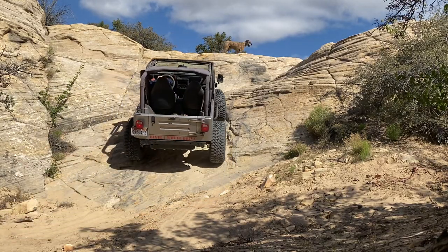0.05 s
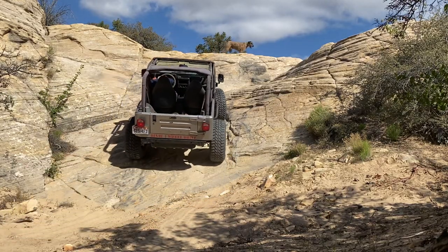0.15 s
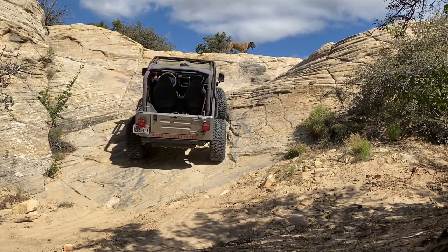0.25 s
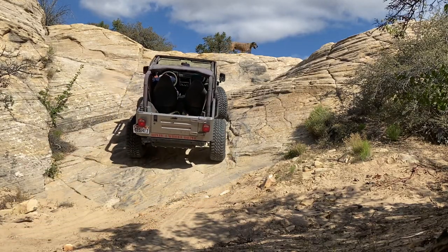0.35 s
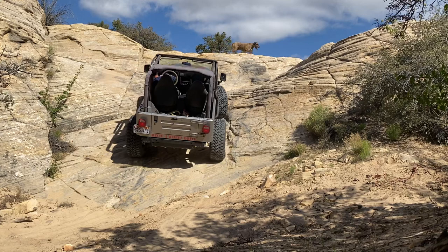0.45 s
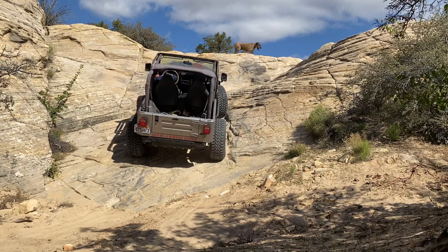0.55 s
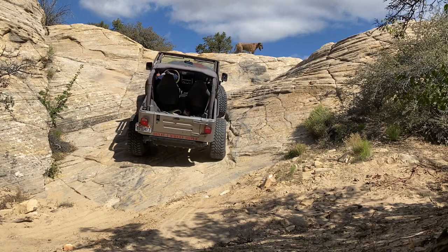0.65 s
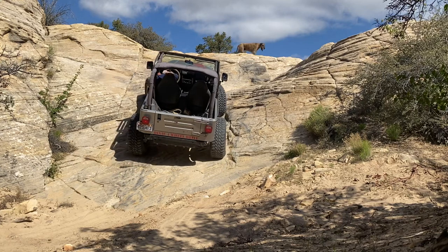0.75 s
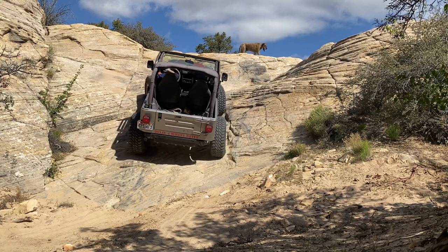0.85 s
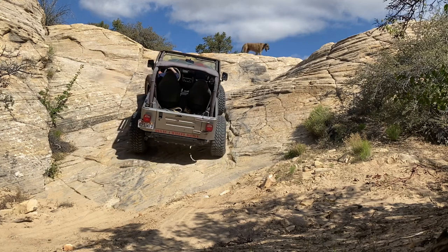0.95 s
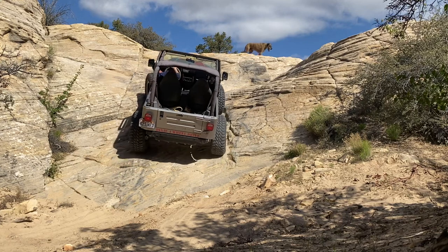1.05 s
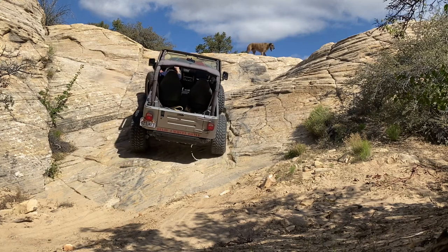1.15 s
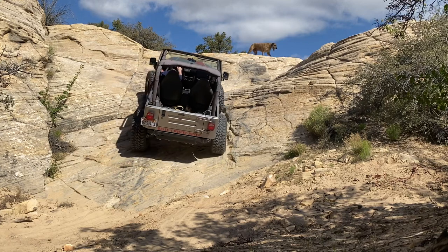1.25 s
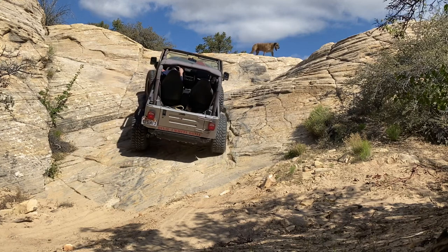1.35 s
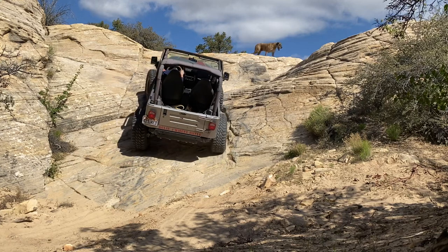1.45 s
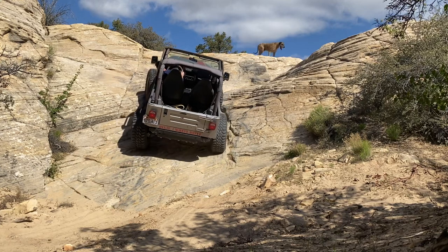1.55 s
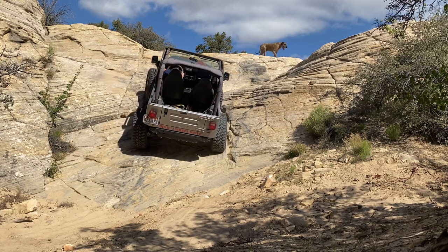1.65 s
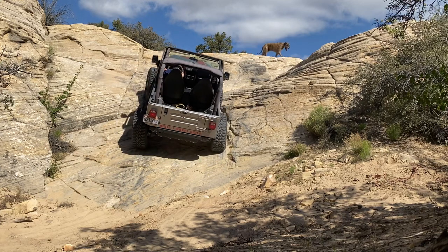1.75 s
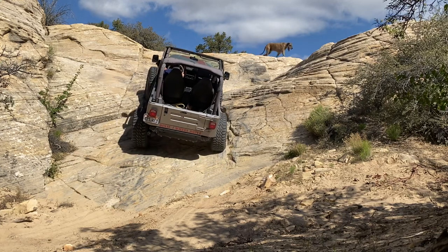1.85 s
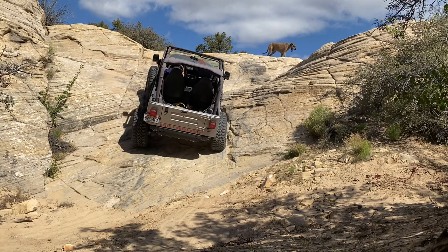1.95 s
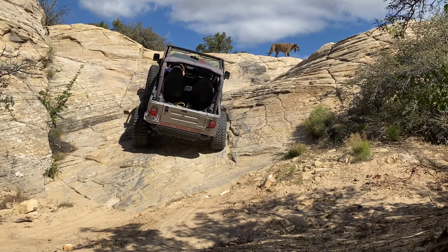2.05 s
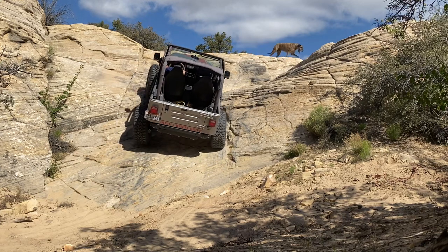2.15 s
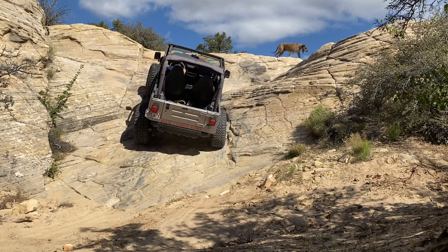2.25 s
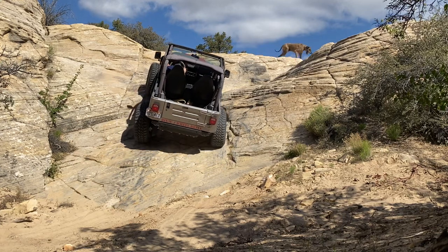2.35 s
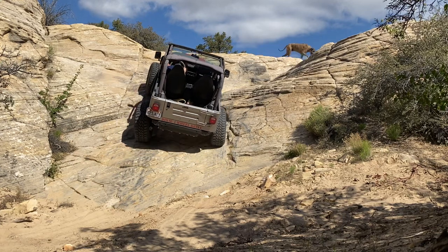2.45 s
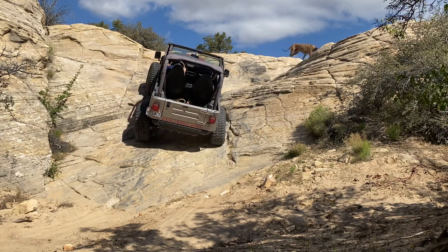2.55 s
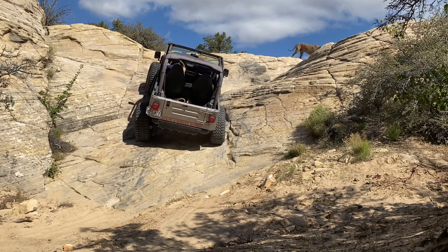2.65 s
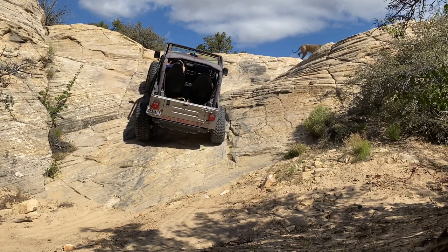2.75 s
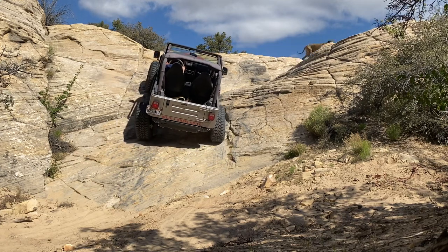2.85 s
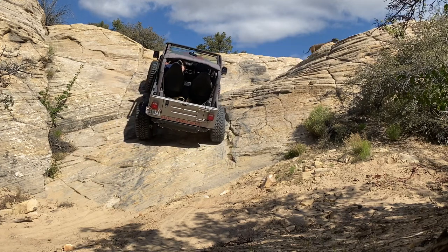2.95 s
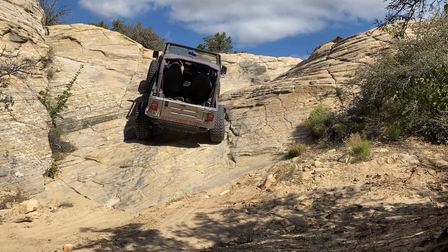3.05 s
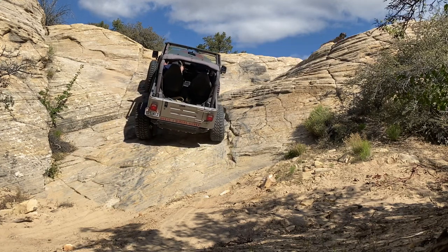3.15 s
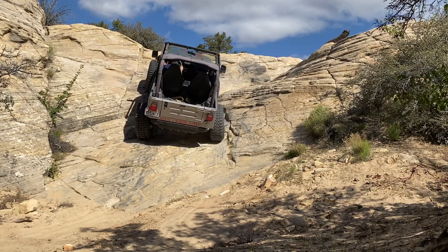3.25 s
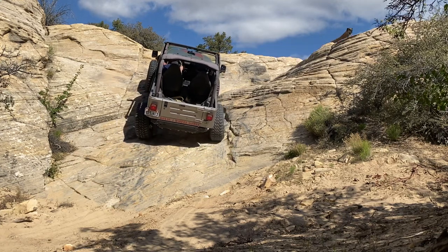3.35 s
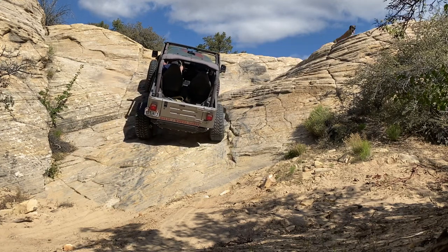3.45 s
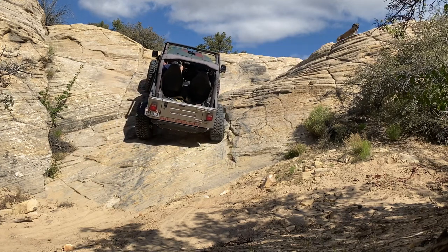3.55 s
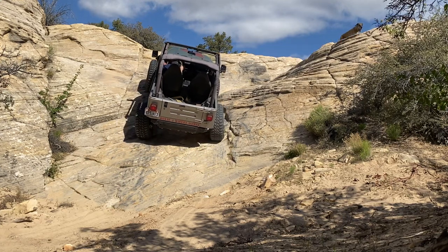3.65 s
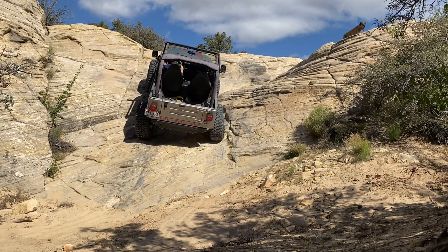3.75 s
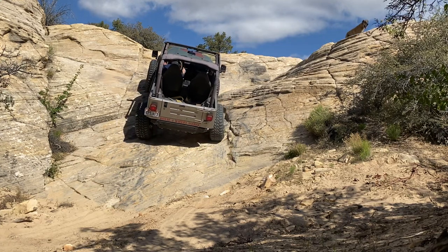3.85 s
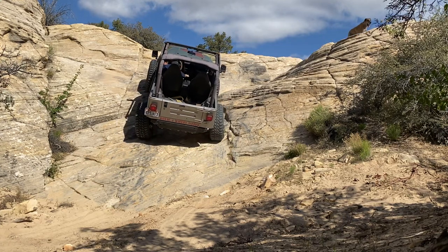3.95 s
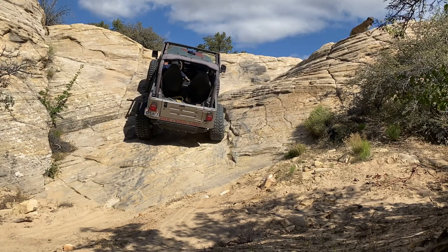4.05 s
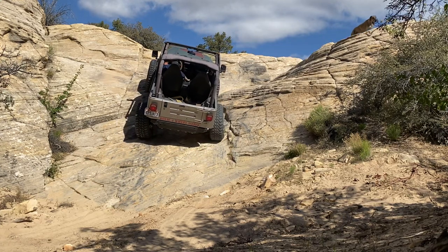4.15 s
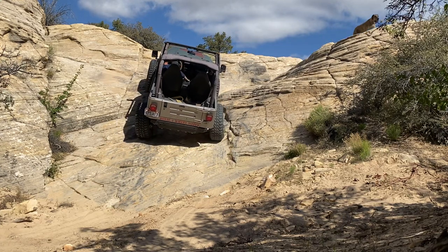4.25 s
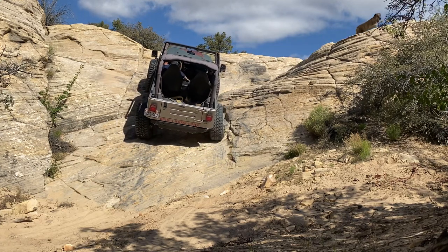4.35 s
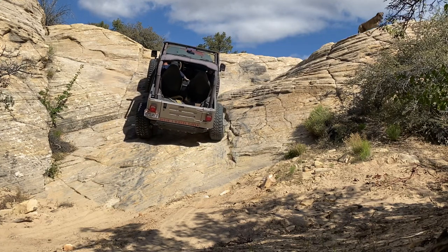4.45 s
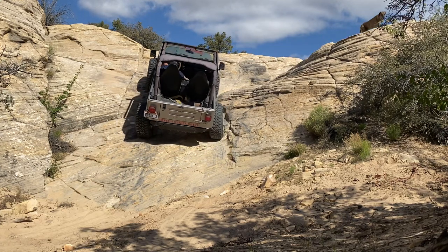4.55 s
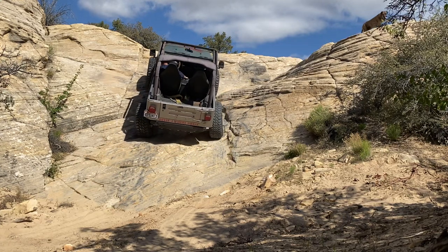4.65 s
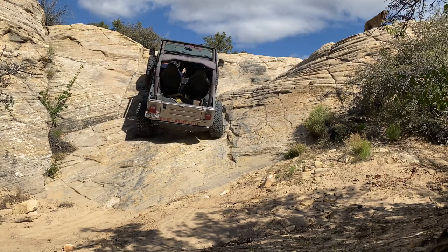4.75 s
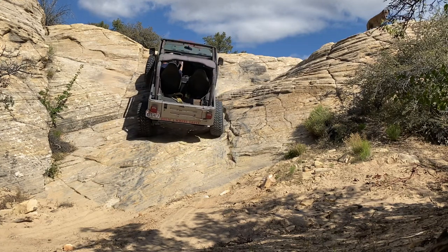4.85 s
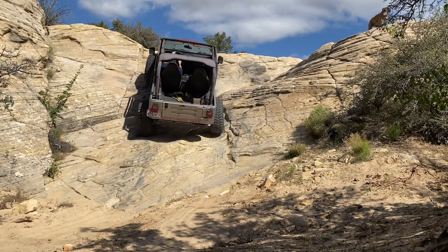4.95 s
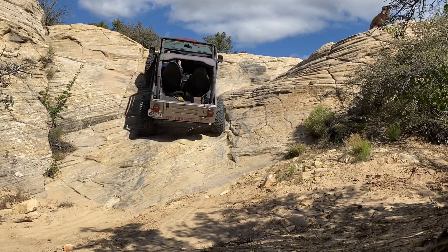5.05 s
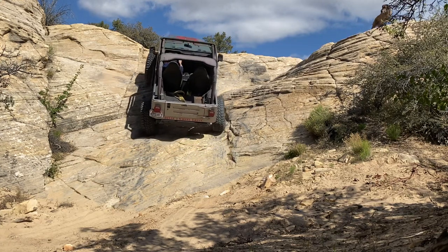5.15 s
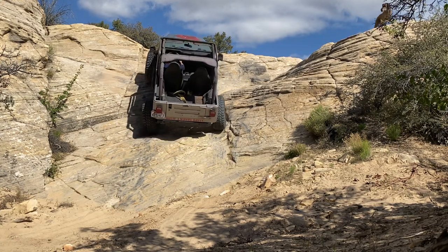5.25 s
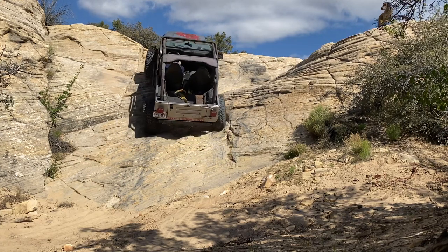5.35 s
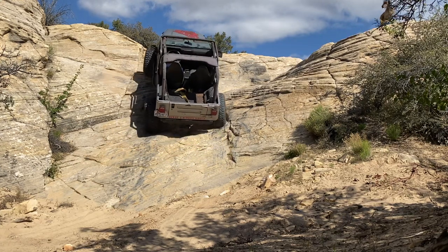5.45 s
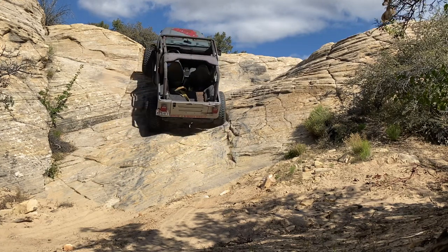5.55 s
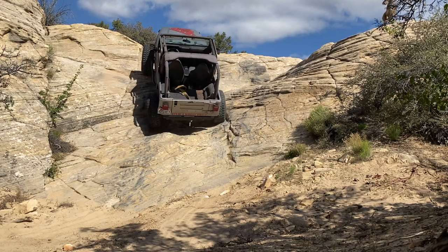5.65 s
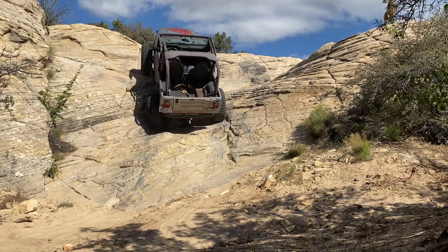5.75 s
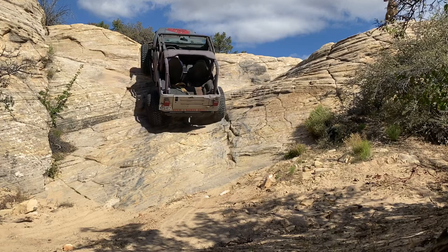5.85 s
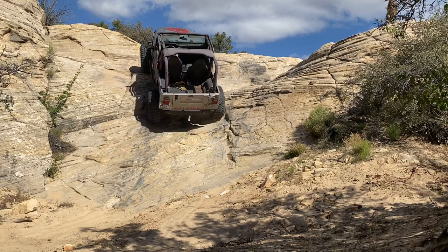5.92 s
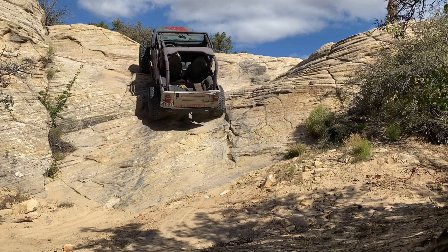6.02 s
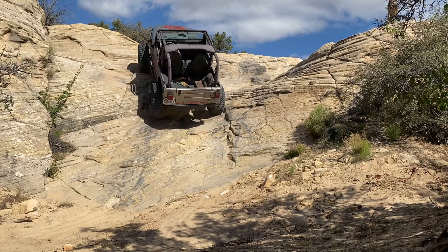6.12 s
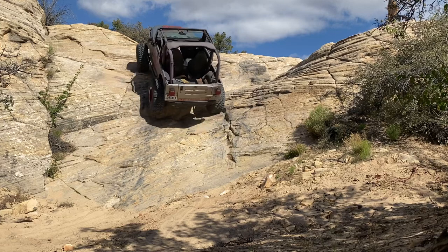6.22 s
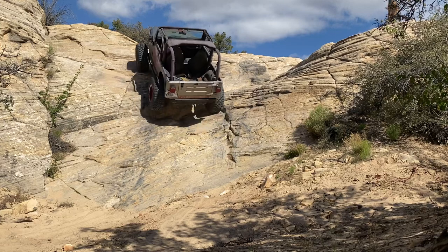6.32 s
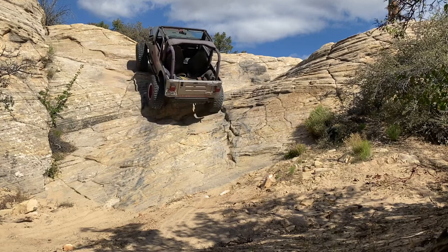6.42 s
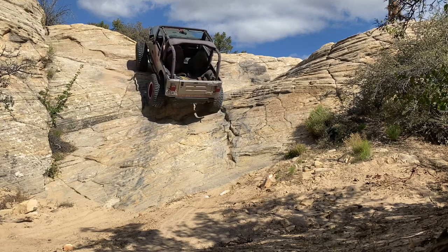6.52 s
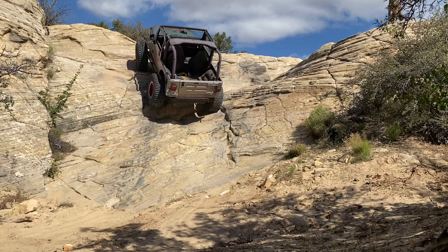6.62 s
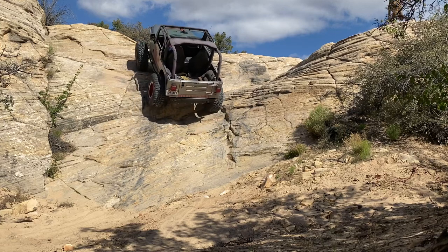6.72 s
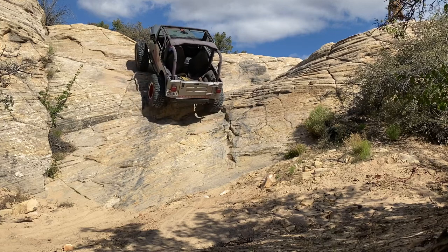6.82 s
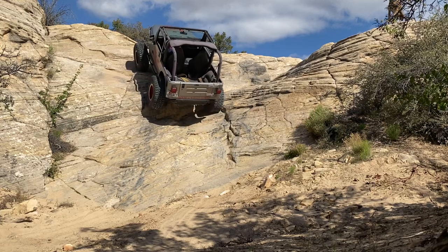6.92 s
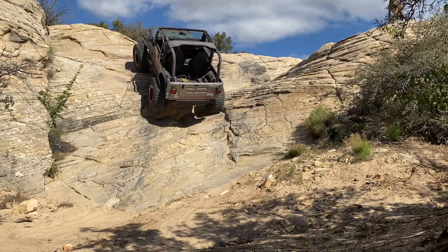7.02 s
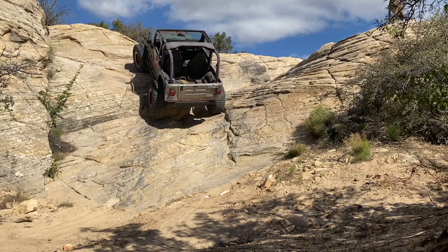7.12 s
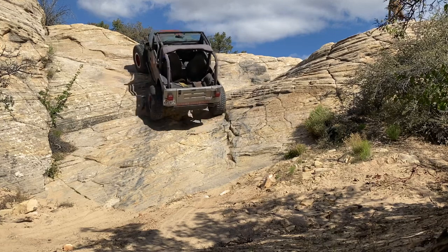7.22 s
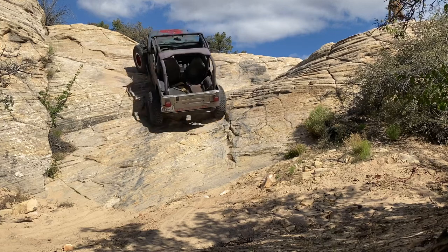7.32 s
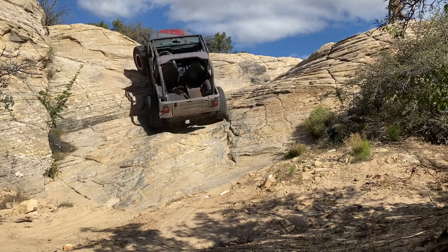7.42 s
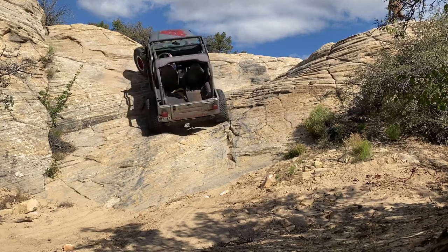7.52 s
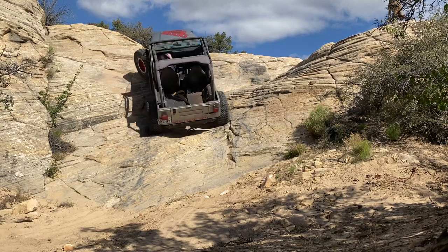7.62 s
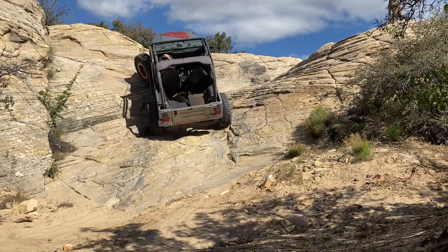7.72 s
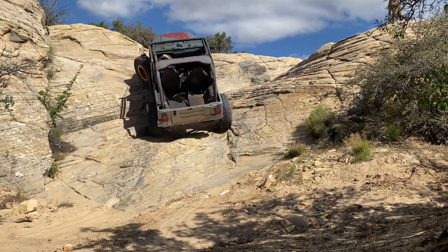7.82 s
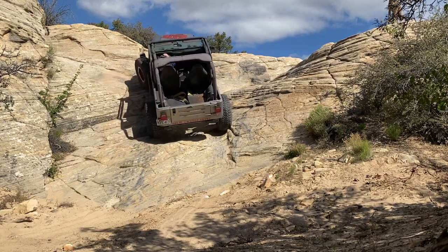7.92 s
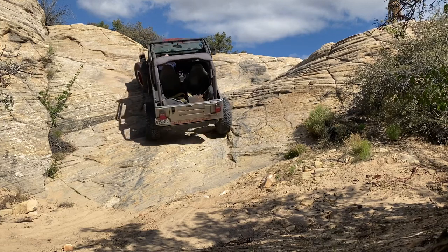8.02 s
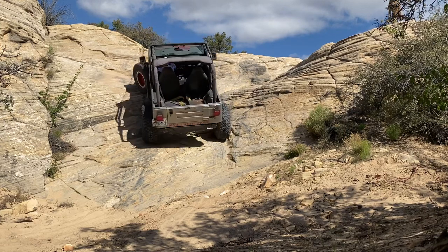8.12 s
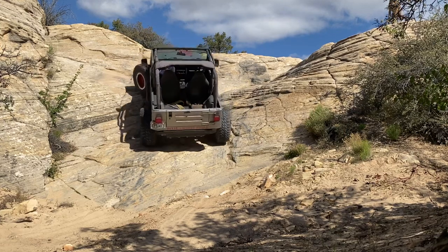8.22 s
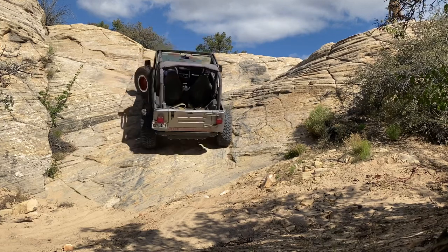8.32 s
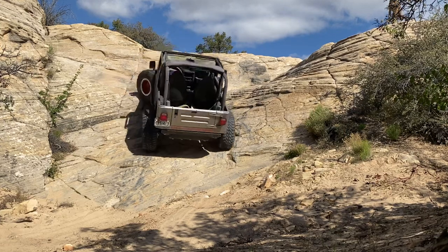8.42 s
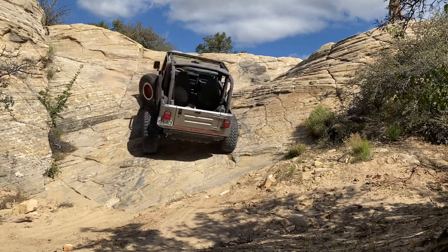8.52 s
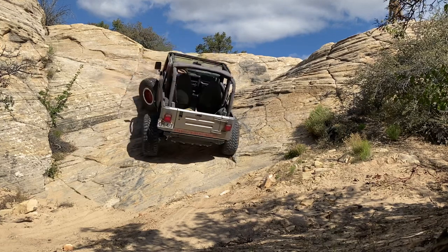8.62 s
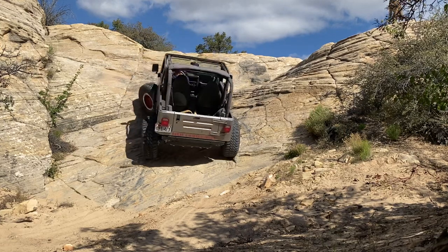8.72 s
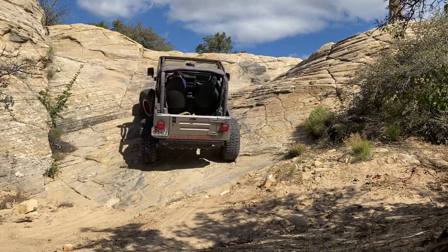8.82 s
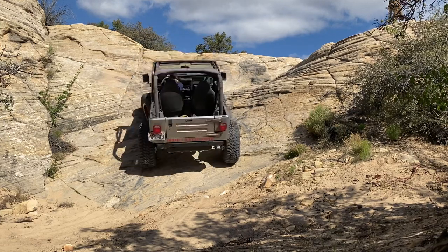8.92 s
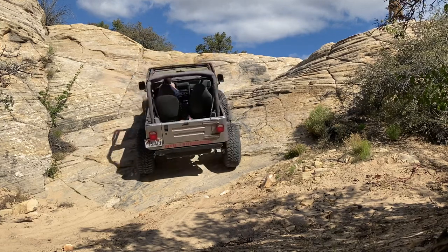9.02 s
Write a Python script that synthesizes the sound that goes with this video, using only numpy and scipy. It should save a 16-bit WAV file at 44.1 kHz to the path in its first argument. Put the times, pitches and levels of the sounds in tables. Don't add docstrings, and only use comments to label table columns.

```python
import sys
import numpy as np
from scipy import signal
from scipy.fft import rfft, irfft, next_fast_len
from scipy.io import wavfile
from scipy.ndimage import uniform_filter1d

SR = 44100
rng = np.random.default_rng(int(sys.argv[2]) if len(sys.argv) > 2 else 0)


def wav_out(sig):
    wavfile.write(sys.argv[1], SR, np.round(np.clip(np.atleast_2d(sig).T, -1, 1) * 32767).astype(np.int16))


def invert_db(x):
    u = np.asarray(x, float) / 20
    return 10 ** u


N = 400428

# multiple_of_firing_rate, lag_rad, slip_rad_per_s
MAIN_ORDERS = [(1, 0, 0), (1.5, -.6, .6), (2, 1.9, .8), (2.5, -1.4, 1), (3, 1.8, .85), (3.5, 2.4, .7),
               (4, .6, .8), (5, 0, .9)]
# frequency_hz, level_db
PIPE = [(20, -34), (45, 0), (75, 3.5), (130, 0), (190, 5.5), (250, -3.5), (310, -3), (420, -7.5),
        (800, -63)]


def evened(x):
    return x / np.sqrt(np.mean(x ** 2) + 1e-20)


def columns(rows):
    s, *rest = np.transpose(rows)
    return [np.interp(np.arange(N) / SR, s, c) for c in rest]


def read(points, hz, axis=1):
    table = np.transpose(points)
    return np.interp(np.log(hz + 1), np.log(table[0] + 1), table[axis])


def add(mix, s, sound):
    part = mix[..., round(s * SR):][..., :sound.shape[-1]]
    part += sound[..., :part.shape[-1]]


def drift(seconds):
    size = max(round(seconds * SR / 64), 2)
    steps = rng.standard_normal(N // 64 + 2)
    steps = uniform_filter1d(uniform_filter1d(steps, size), size)
    return np.interp(np.arange(N) / 64, np.arange(len(steps)), evened(steps))


def noise(shape, patchy_db, size=512):
    hz = np.fft.rfftfreq(size, 1 / SR)
    frames = 4 * N // size + 6
    a, b, c, d, patches = rng.standard_normal((frames, len(hz), 5)).T
    patches = evened(uniform_filter1d(uniform_filter1d(patches, 6, axis=0), 12, axis=1))
    z = np.array([a + 1j * b, c + 1j * d]) * invert_db(read(shape, hz)[:, None] + patchy_db * patches)
    return evened(signal.istft(z, nperseg=size, noverlap=3 * size // 4)[1][:, :N])


def engine():
    # start_s, firing_rate_hz, load_db,
    # unevenness_db, bite_db
    revs = [(0.0, 57.66, -14.5, 1.8, -35), (0.43, 61.14, -13, 1.96, -38.4), (1.0, 58.23, -17, 2.0, -34),
            (1.62, 56.37, -17, 1.54, -31.5), (2.0, 57.84, -17, 2.0, -33.5), (2.33, 60.5, -17, 2.5, -36.5),
            (2.9, 58.98, -13.5, 2.0, -39.5), (3.4, 58.48, -13.5, 1.86, -39),
            (4.0, 59.66, -13.3, 1.98, -40), (4.39, 60.6, -14, 2.5, -39.7), (4.7, 71.4, -17.0, 3.5, -35.4),
            (4.9, 83, -19, 3, -29), (5.05, 90.4, -12.6, 1.86, -29.5), (5.35, 97.6, -10.5, 1.35, -29.5),
              (5.5, 76.36, -21.5, 3, -31), (5.66, 60.16, -13, 1.95, -44.5), (5.8, 72.36, -13.5, 2.0, -36),
              (5.95, 89.4, -13, 2.16, -32), (6.1, 70.6, -16.5, 2, -36.5), (6.32, 44.85, -16.5, 0.5, -36.5),
              (6.5, 35.3, -24, 1.5, -33), (6.68, 26, -28, 1.5, -29), (6.97, 23.23, -36.5, 4, -32.5),
              (7.15, 37.04, -20, 2.14, -34), (7.4, 44.97, -10.5, -0.8, -33.5),
              (7.71, 49.1, -13.5, -2.5, -28.5), (8.2, 40.74, -17, -1.5, -32),
              (8.69, 33.44, -18.5, 0.6, -36), (9.08, 36.66, -21, 1.5, -33.5)]
    hz, load_db, uneven_db, bite_db = columns(revs)
    flywheel_s = 0.088
    hz = uniform_filter1d(hz, round(flywheel_s * SR), mode="nearest")
    return hz, load_db, uneven_db, bite_db


def throttle(hz):
    lag_s, full_oct_per_s = 0.075, 1
    open_db, shut_db = 4, 6.5
    oct_per_s = uniform_filter1d(np.gradient(np.log2(hz)) * SR, round(lag_s * SR))
    climb = np.tanh(oct_per_s / full_oct_per_s)
    return np.where(climb > 0, open_db, shut_db) * climb


def order_levels(hz, load_db, uneven_db, more_bite_db, open_db):
    # strength_db, gain_db_per_unevenness_db, gain_db_per_bite_db
    firing = [(12.5, -2, -0.09), (-8, 3.5, 0.71), (-0.8, 4.5, 1.6548), (-8.5, 3, 2.02), (1.92, 4.5, -0.59),
              (-11, 6, 1.5), (-2, 0.6, 1.47), (-2.5, 2.5, 1.2)]
    # frequency_hz, level_db
    tailpipe = [(30, -27.2), (45, -24), (60, -10), (72, -2.5), (85, -3.5), (100, -12.5), (120, -15.5),
                (145, -21.5), (165, -19.2), (185, -21), (210, -23), (240, -23.5), (290, -28), (400, -38)]
    levels = [load_db + db + per_uneven * uneven_db + per_bite * more_bite_db + read(tailpipe, k * hz)
              for (k, _, _), (db, per_uneven, per_bite) in zip(MAIN_ORDERS, firing)]
    levels[-3:] = [db + 0.42 * open_db for db in levels[-3:]]
    return levels


def exhaust(hz, turns, main_db, fourth_db, lope_db):
    # multiple_of_firing_rate, level_db
    weak_orders = [(.5, -8.5), (0.749, -13), (1.249, -20), (1.749, -1.5), (2.25, -12.5), (2.75, -6.5),
                   (3.25, -8.5), (3.75, -5), (4.25, -6.5), (4.5, -1.5), (6, -14.5)]
    t = np.arange(N) / SR
    tone = np.zeros(N)
    for (k, lag, slip_rate), db in zip(MAIN_ORDERS, main_db):
        tone += invert_db(db + 0.13 * k * drift(0.079)) * np.cos(2 * np.pi * k * turns + lag + slip_rate * t)
    source_db = uniform_filter1d(fourth_db - read(PIPE, 4 * hz), size=5000)
    for k, db in weak_orders:
        k = round(4 * k) / 4
        drive_db = lope_db if k % 1 else source_db
        level = invert_db(drive_db + db + read(PIPE, k * hz) + 3.0 * drift(0.095))
        tone += level * np.cos(2 * np.pi * (k * turns + rng.random()) + 0.37 * drift(0.088))
    return np.sqrt(2) * tone


def puffs(turns, depth, spread_db):
    strength = invert_db(spread_db * rng.standard_normal(1000))[turns.astype(int)]
    return uniform_filter1d(evened(1 - depth + depth * strength * np.exp(-(turns % 1) / 0.7)), 60)


def rumble(turns, effort_db, shaken):
    # frequency_hz, level_db
    rumble_shape = [(25, -38.5), (50, 14), (110, 2), (200, 11), (300, 5.5), (370, 4.5), (440, 5.5),
                    (500, 2.5), (570, 0.5), (660, -4), (850, -9.5), (1300, -41)]
    level = np.hypot(invert_db(effort_db), shaken)
    return invert_db(8.0) * level * puffs(turns, 0.41, 2.5) * noise(rumble_shape, 0.96, size=2048)


def tyre_effort():
    # start_s, scrub_db
    tyres = [(0, -51), (4.4, -52.5), (4.72, -43), (5.35, -43), (5.42, -49.5), (5.7, -51.5), (5.8, -43),
             (5.93, -43), (6.33, -57), (6.43, -60), (6.93, -60), (7.1, -52.5), (7.8, -52), (8.05, -39.5),
             (8.4, -44), (8.66, -49), (8.85, -44.5), (9.08, -50.5)]
    return columns(tyres)[0]


def scrub_and_fizz(turns, scrub_db, more_scrub_db, rubbed, fizzed):
    # frequency_hz, level_db
    scrub_shape = [(300, -18), (700, -1.5), (1000, 1), (1400, -1), (2100, -5.5), (2800, -10.5), (3200, -14),
                   (4500, -32)]
    fizz_shape = [(2200, -13), (3200, -4.5), (4400, 1.5), (5700, -1), (6800, -0.5), (8500, 0), (10500, -11),
                  (12300, -16), (16000, -22.5)]
    gusts = drift(0.019)
    scrub_level = invert_db(4.5 + 0.86 * gusts) * np.hypot(invert_db(scrub_db), rubbed)
    fizz_level = invert_db(9.5 + 1.0 * gusts) * np.hypot(invert_db(-64 + more_scrub_db), fizzed)
    scrub = scrub_level * puffs(turns, 0.18, 1.1) * noise(scrub_shape, 1.1)
    return scrub + fizz_level * puffs(turns, .1, 2.1) * noise(fizz_shape, 1.4)


def knock(db, hz, t60):
    t = np.arange(4000) / SR
    crack_band = signal.butter(2, [500, 2600], "band", fs=SR)
    crack = signal.lfilter(*crack_band, rng.standard_normal(len(t)))
    ring = np.sin(2 * np.pi * hz * t) + 0.55 * np.sin(2 * np.pi * 1.63 * hz * t)
    return invert_db(db - 5.5) * (ring * invert_db(-60 * t / np.clip(t60, .02, .1)) + 0.4 * crack * invert_db(-60 * t / 0.0074))


def knocks(mix):
    # start_s, peak_db,
    # pitch_hz, t60_s
    hits = [
        (.283, -31, 600, .04),
        (.384, -37, 600, .04),
        (1.314, -33, 550, 0.036),
        (2.4, -25, 606, 0.043),
        (6.37, -33, 580, 0.062),
            (0.884, -29, 565, 0.065),
        (1.619, -30.5, 470, 0.053),
        (4.472, -13, 388, 0.03),
        (5.789, -22, 405, 0.049),
        (6.953, -27.5, 550, 0.059),
        (7.811, -33, 405, 0.032),
        (7.996, -20, 1200, 0.0364),
        (8.688, -22.5, 403, 0.024),
        (8.754, -12.5, 554, 0.03),
        (8.761, -8, 401, 0.039),
    ]
    for s, *row in hits:
        add(mix, s, knock(*row))


def squeak(length, start_hz, end_hz, db, overtones_db):
    t = np.linspace(0, 1, round(length * SR))
    flutter = uniform_filter1d(uniform_filter1d(rng.standard_normal(9000), 90), 90)
    flutter = evened(flutter)[:len(t)]
    pitch_hz = (start_hz + (end_hz - start_hz) * np.sqrt(t)) * (1 + 0.007 * flutter[::-1])
    turn = 2 * np.pi * np.cumsum(pitch_hz) / SR
    tone = np.sin(turn) + invert_db(overtones_db) * (np.sin(2 * turn) + 0.41 * np.sin(3 * turn))
    return invert_db(db + 13.0 + 2.5 * flutter) * tone * np.minimum(t / 0.17, 1) * (1 - t) ** 1.45


def squeaks(mix):
    # start_s, length_s, start_hz, end_hz, peak_db
    spring = [(.46, 0.073, 3840, 3920, -51), (6.036, 0.16, 3980, 3983, -49), (6.29, .045, 3925, 3915, -78),
              (6.46, 0.027, 3970, 3930, -68), (6.633, .11, 4020, 4044, -47),
              (7.222, 0.029, 3910, 3990, -47), (7.37, .08, 3877, 3940, -42.5),
              (7.71, .045, 4035, 3930, -55.5), (8.388, 0.032, 3964, 3865, -36.5),
              (8.686, 0.16, 3746, 4015, -43)]
    shackle = [(5.577, .05, 4260, 4380, -50), (6.692, .061, 4359, 4600, -56.5),
               (7.421, 0.047, 4520, 4010, -58), (7.672, .05, 4520, 4490, -51.5)]
    panel = [(6.743, .04, 10500, 10460, -59.5), (6.955, 0.062, 4200, 4050, -60),
             (7.006, 0.025, 6520, 6330, -56), (7.892, 0.031, 4314, 4333, -45),
             (7.932, 0.067, 5010, 4800, -52), (8.212, .091, 4520, 4380, -51),
             (8.364, 0.026, 5900, 6000, -45), (8.462, 0.037, 2880, 2830, -33)]
    for joint, overtones_db in (spring, -7.5), (shackle, -3.5), (panel, -22):
        for s, *row in joint:
            add(mix, s, squeak(*row, overtones_db))


def scrapes():
    # start_s, length_s, scrub_db, fizz_re_scrub_db,
    # rumble_re_scrub_db
    scrape_rows = [(1.088, 0.56, -54, -20, 9), (3.453, 1, -54.5, -11, -5), (3.845, 0.51, -60, -25, 2.5),
                   (4.445, 0.077, -47.5, -14, 8.5), (4.897, 0.13, -45, -11, -13),
                   (5.428, 0.091, -48.5, -19, 14.5), (5.632, 0.058, -47, -14, -1),
                   (6.34, 0.085, -56, -12.5, 8), (6.52, .03, -65, 4, 2), (6.686, 0.13, -47.5, -12.5, 6.5),
                   (6.796, 0.12, -54, -29, -1), (6.953, .035, -42, -20, 0), (6.99, 0.054, -48.5, -9, -5),
                   (7.1, 0.23, -56, -17, 8.5), (7.475, 0.28, -48.5, -12, -8), (7.786, 0.0082, -45, -10, 6),
                   (7.82, 0.13, -46, -20, 7), (8.203, 0.05, -42, -13, -5.5), (8.411, 0.16, -40, -6, -7),
                   (8.471, 0.031, -24, -15, -16), (8.588, 0.088, -45.5, -14.5, 10.5),
                   (8.686, 0.048, -46.5, -4, 6), (8.942, 0.058, -45.5, -5, -1),
                   (9.072, 0.025, -50, -7, 11.5)]
    gains = np.zeros((3, N))
    for s, length, db, fizz_db, rumble_db in scrape_rows:
        shape = np.sin(np.pi * np.linspace(0, 1, round(length * SR)) ** 0.59)
        add(gains, s, invert_db(db + np.array([[0], [fizz_db], [rumble_db]])) * shape)
    return gains


def slip(length, hz, width_hz, db):
    t = np.arange(round(length * SR)) / SR
    grit = (rng.standard_normal(9000) + 1j * rng.standard_normal(9000))[:len(t)]
    r = np.exp(-np.pi * width_hz / SR)
    band = signal.lfilter([1], [1, -2 * r, r ** 2], grit) * np.exp(2j * np.pi * hz * t)
    return invert_db(db) * evened(band.real) * np.sin(np.pi * (t / length) ** 0.69)


def tread_slips(mix):
    # start_s, length_s, centre_hz, width_hz, rms_db
    slips = [(2.364, .11, 1300, 1201, -43), (4.653, .08, 1700, 1500, -40.5),
             (5.901, 0.065, 2586, 1400, -39), (6.515, 0.04, 3600, 900, -56), (7.918, .025, 2505, 4050, -33),
             (7.994, 0.2, 1642, 700, -36), (8.815, 0.13, 2350, 750, -41.5), (8.932, 0.033, 6995, 1800, -40)]
    more_slips = [(4.47, 0.097, 1300, 700, -45), (4.669, .05, 6560, 4030, -47), (5.502, .03, 5000, 3000, -50),
                  (5.711, 0.076, 1185, 899.6, -43), (5.861, 0.12, 1096, 599.4, -38),
                  (5.904, 0.059, 6600, 4030, -42), (6.148, 0.18, 1494, 902.4, -47.5),
                  (6.811, 0.12, 1520, 698.6, -50.5), (7.999, 0.054, 7030, 3980, -38),
                  (8.777, .2, 9340, 3976, -48.5)]
    # start_s, peak_db, centre_hz
    bites = [(4.5942, -35.5, 1310), (4.6348, -30.5, 1030), (4.6815, -25, 1584), (4.8264, -26, 1407),
             (4.8642, -22.5, 1116), (4.9195, -26.5, 1028), (5.1626, -24.5, 1503), (5.3306, -30, 1090),
             (5.4335, -36, 1320), (5.584, -36, 1115), (5.7132, -28.5, 1083), (5.787, -26, 1050),
             (5.8643, -30, 1136)]
    for s, *row in slips + more_slips:
        add(mix, s, slip(*row))
    bite_s, bite_width_hz = 0.04, 830
    for s, db, centre_hz in bites:
        add(mix, s, slip(bite_s, centre_hz, bite_width_hz, db - 11))


def crunch():
    # start_s, level_db
    grind = [
        (8.39, -34),
        (8.44, -17.5),
        (8.468, -9),
        (8.5, -11),
        (8.54, -21),
        (8.6, -33),
    ]
    # frequency_hz, width_hz, level_db
    chassis = [(194, 23.4, -31), (284, 32, 2), (343, 40, -6.5), (413, 90, -1), (500, 20, 5),
               (556, 14, -0.5), (599, 20, 1), (655, 24, -3.5), (760, 220, -16), (1264, 66, -11),
               (1630, 30, -25), (1900, 75, -31)]
    s, db = np.transpose(grind)
    t = np.arange(s[0], s[-1], 1 / SR)
    happens = rng.random(len(t)) < 4200 / SR
    slips = rng.standard_normal(len(t)) * happens * invert_db(4.6 * np.minimum(rng.exponential(1, len(t)), 3))
    ring = np.arange(3000) / SR
    body = sum(invert_db(d) * w * np.exp(-np.pi * w * ring) * np.sin(2 * np.pi * f * ring) for f, w, d in chassis)
    body -= uniform_filter1d(body, size=140)
    grit = invert_db(-38) * np.diff(evened(slips + 0.58 * rng.standard_normal(len(t))), prepend=0)
    sound = evened(signal.oaconvolve(slips, body)[:len(t)]) + grit
    return s[0], invert_db(np.interp(t, s, db)) * sound * signal.windows.tukey(len(t), .2)


def blows(mix):
    # start_s, peak_db, pitch_hz
    blow_rows = [
        (8.408, -13, 361),
        (8.452, -8.5, 355),
        (8.466, -3.5, 330),
        (8.49, -4.5, 530),
        (8.6, -25, 250),
        (8.607, -24, 272),
        (8.643, -23, 250),
        (8.647, -24, 250),
    ]
    for s, db, ring_hz in blow_rows:
        add(mix, s, knock(db - 0.5, ring_hz, 0.047))


def ports(direct, scattered):
    # frequency_hz, left_re_right_db, coherence_0_to_1
    port_pair = [(60, -.35, .997), (140, -.9, .996), (300, -.6, .992), (550, .1, .9), (850, .5, .77),
                 (1200, -3.2, .74), (1700, -4.6, .8), (2400, -4.2, .8), (3200, -2.9, .68), (4900, -1.5, .5),
                 (7000, -4, .55), (8800, -1.3, .65), (12000, -.3, .75)]
    # frequency_hz, left_lead_rad
    lead = [(60, -.02), (300, .02), (550, 0), (850, -.28), (1200, -.28), (1700, .06), (2400, .62),
            (3200, 2), (4900, 2.3), (6000, 4.1), (7000, 5.2), (8800, 2.4), (10200, .9), (12000, -.5)]
    size = next_fast_len(N)
    hz = np.fft.rfftfreq(size, 1 / SR)
    same = read(port_pair, hz, axis=2)
    left = rfft(direct, size)
    right = same * left + np.sqrt(1 - same ** 2) * rfft(scattered, size)
    step = invert_db(read(port_pair, hz) / 2) * np.exp(.5j * read(lead, hz))
    return irfft(np.array([left * step, right / step]), size)[:, :N]


def scene():
    # start_s, left_re_right_db
    roll = [(0.0, 0.0), (1.87, -0.5), (4.6, -0.5), (5.16, -1.5), (5.84, 0.0), (7.23, -0.5), (8.09, -1.0),
            (9.08, -0.5)]
    hz, load_db, uneven_db, bite_db = engine()
    turns = np.cumsum(hz) / SR
    open_db = throttle(hz)
    scrub_db = tyre_effort()
    more_load_db, more_scrub_db, more_bite_db = load_db + 15, scrub_db + 52, bite_db + 36

    effort_db = -42.5 + 0.53 * open_db + 0.086 * more_load_db + 0.45 * more_scrub_db + 0.069 * more_bite_db
    main_db = order_levels(hz, load_db, uneven_db, more_bite_db, open_db)
    fourth_db = bite_db + 0.27 * open_db + read(PIPE, 4 * hz)
    lope_db = .5 * uniform_filter1d(effort_db, size=8000) - 19.5 + 0.24 * open_db + 2 * uneven_db
    tones = exhaust(hz, turns, main_db, fourth_db, lope_db)

    rubbed, fizzed, shaken = scrapes()
    wash = rumble(turns, effort_db, shaken)
    wash += scrub_and_fizz(turns, scrub_db, more_scrub_db, rubbed, fizzed)

    parts = np.zeros(N)
    knocks(parts)
    squeaks(parts)
    tread_slips(parts)
    add(parts, *crunch())
    blows(parts)
    echo = invert_db(-4.0) * np.roll(parts, 310) - invert_db(-3) * np.roll(parts, 740)

    lean = invert_db((columns(roll)[0] + .5) / 2 * np.array([[1], [-1]]))
    return lean * ports(tones, 0 * tones) + ports(wash[0] + parts, wash[1] + echo)


def gate(x, edge_hz, open_share, jump_db):
    hz, _, z = signal.stft(x, SR, nperseg=2048)
    chance = uniform_filter1d(rng.standard_normal((len(hz) // 8 + 1, z.shape[1])), size=2, axis=1)
    chance = np.repeat(chance, 8, axis=0)[:len(hz)]
    chance = chance + 1.2 * uniform_filter1d(rng.standard_normal(z.shape[1]), size=4)
    loud_db = 10 * np.log10((abs(z[hz > edge_hz]) ** 2).mean(0) + 1e-20)
    chance -= .6 * (loud_db - uniform_filter1d(loud_db, size=40))
    shut = (chance > np.quantile(chance, open_share)) & (hz[:, None] > edge_hz)
    gap = (hz > 12400) & (hz < 14450)
    level_db = 10 * np.log10(uniform_filter1d(abs(z[gap]) ** 2, size=30, axis=0) + 1e-20)
    shut[gap] |= level_db - uniform_filter1d(level_db, size=15, axis=1) < jump_db
    return signal.istft(z * ~shut, SR, nperseg=2048)[1][:N]


def band_limit(x):
    return signal.sosfilt(signal.butter(12, 17070, fs=SR, output="sos"), x)


def record(dry):
    # frequency_hz, mid_db, side_db
    top_band = [(10100, 0, 0), (10350, 0, -45), (11600, 0, -45), (11800, -1, 2), (12200, -3, 3),
                (12450, -9, 4), (14300, -16, 3), (14600, -2, -6), (15100, 0, -45), (15600, -3, -60),
                (15850, -50, -70), (16900, -70, -80)]
    size = next_fast_len(N)
    hz = np.fft.rfftfreq(size, 1 / SR)
    over = np.maximum(abs(dry) - .6, 0)
    limited = dry - np.sign(dry) * (over - .3 * np.tanh(over / .3))
    left, right = rfft(limited, size)
    mid = irfft((left + right) / 2 * invert_db(read(top_band, hz)), size)[:N]
    side = irfft((left - right) / 2 * invert_db(read(top_band, hz, axis=2)), size)[:N]
    mid = gate(mid, edge_hz=14450, open_share=.3, jump_db=5.5)
    side = gate(side, edge_hz=11000, open_share=.75, jump_db=-20)
    return band_limit(np.array([mid + side, mid - side]))


dry = scene()
out = record(dry)
wav_out(out)
```